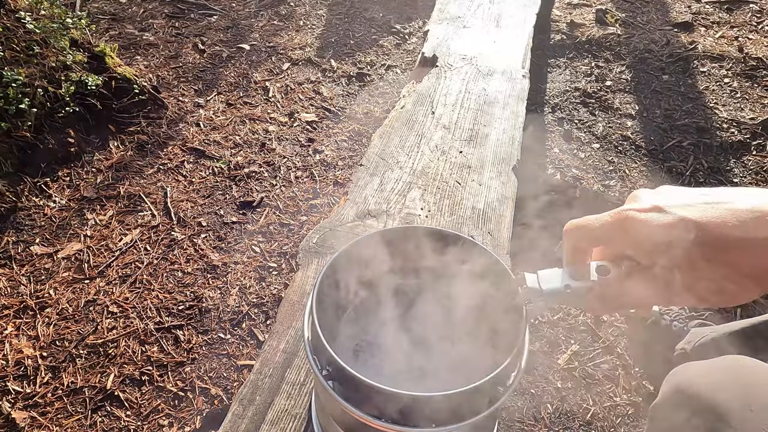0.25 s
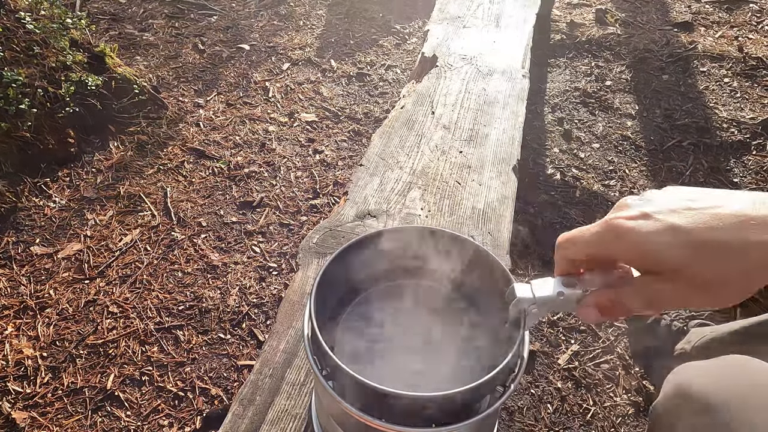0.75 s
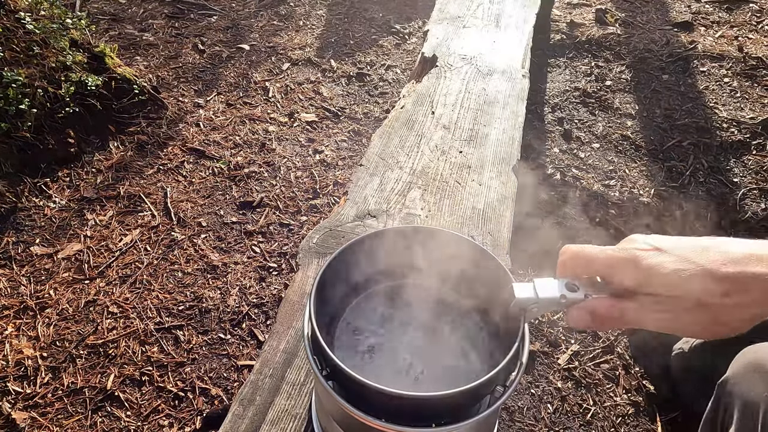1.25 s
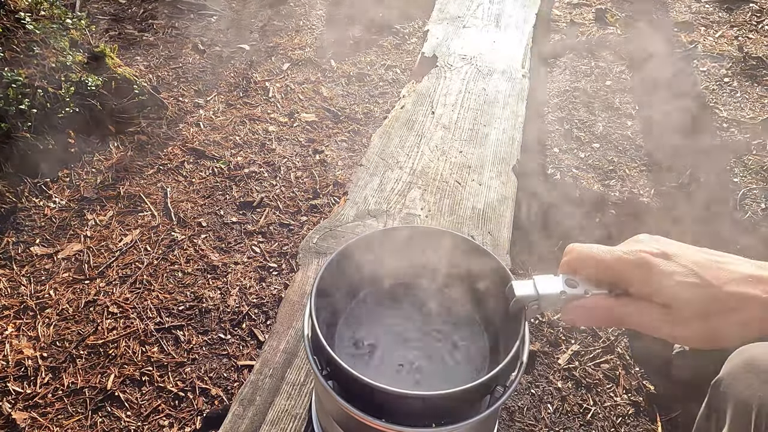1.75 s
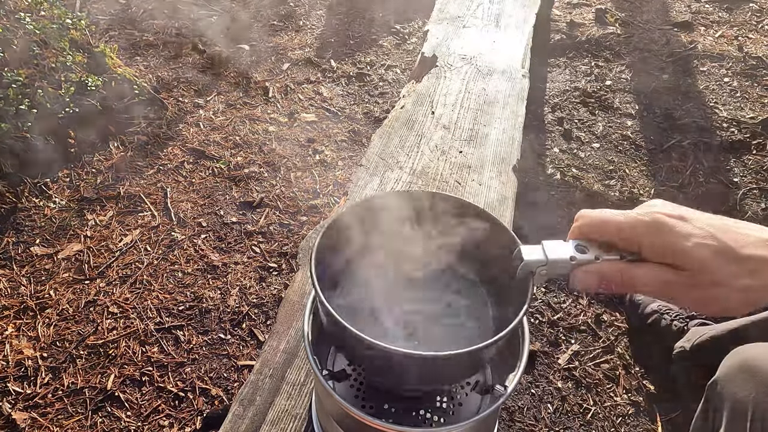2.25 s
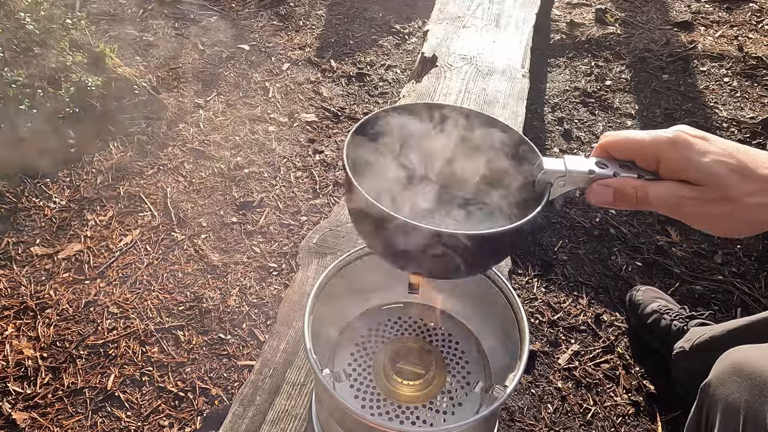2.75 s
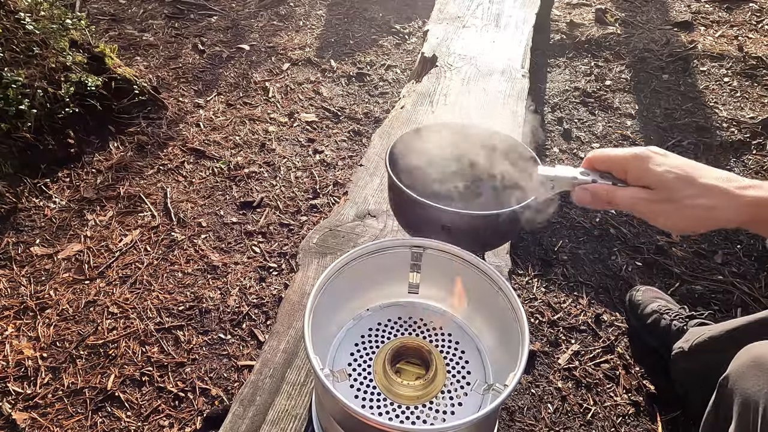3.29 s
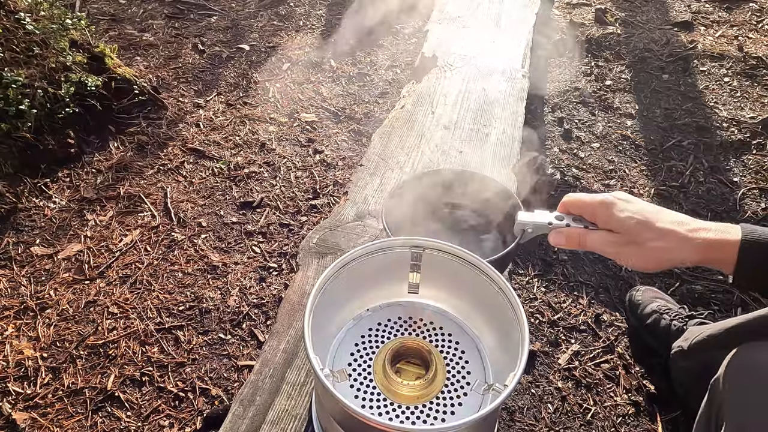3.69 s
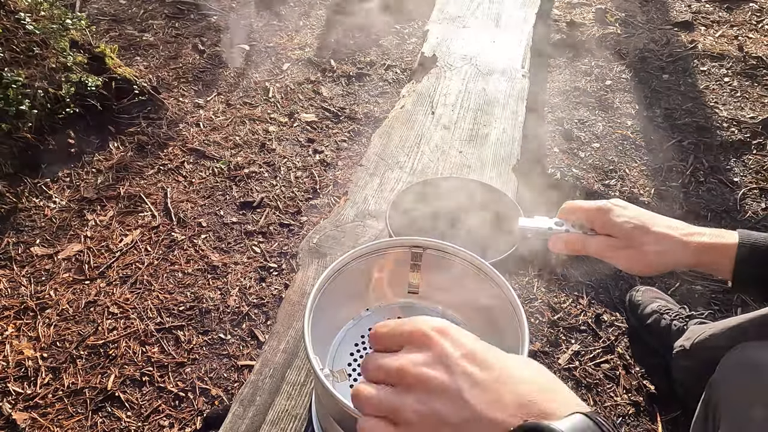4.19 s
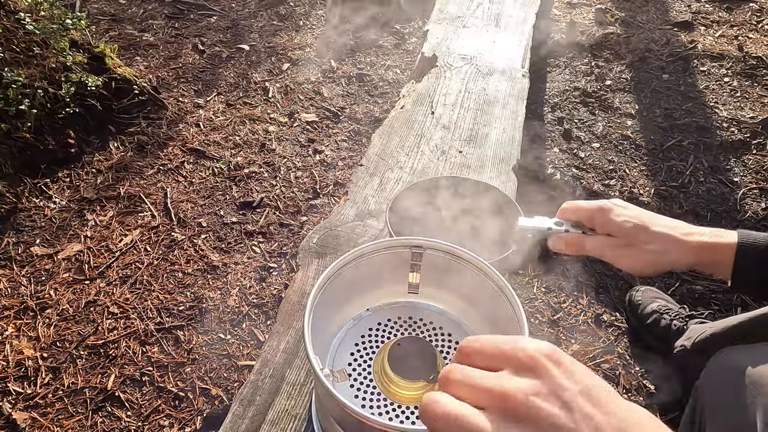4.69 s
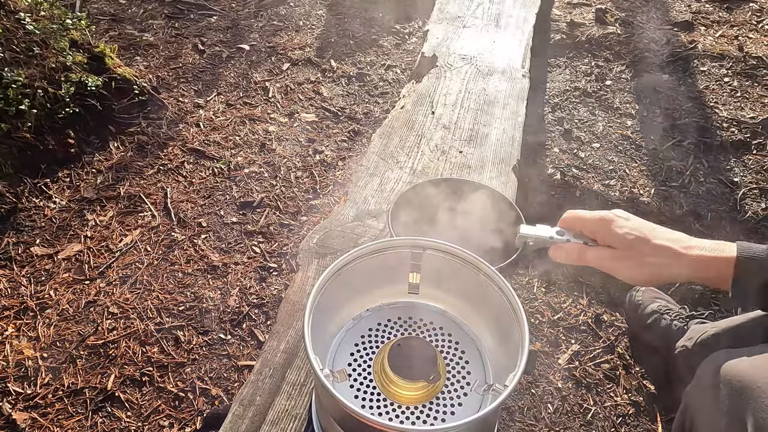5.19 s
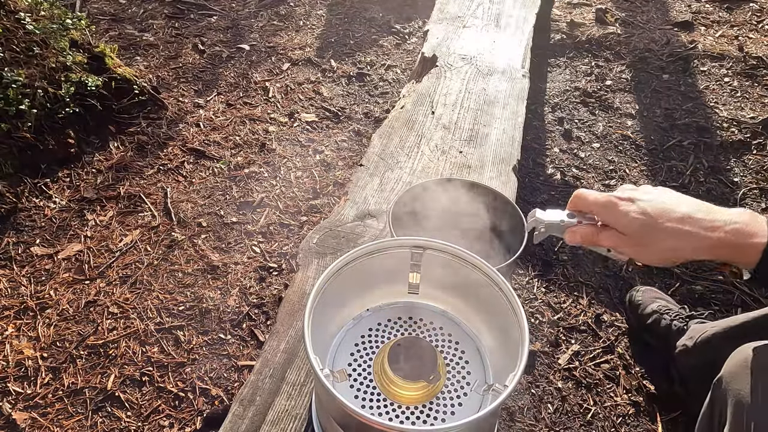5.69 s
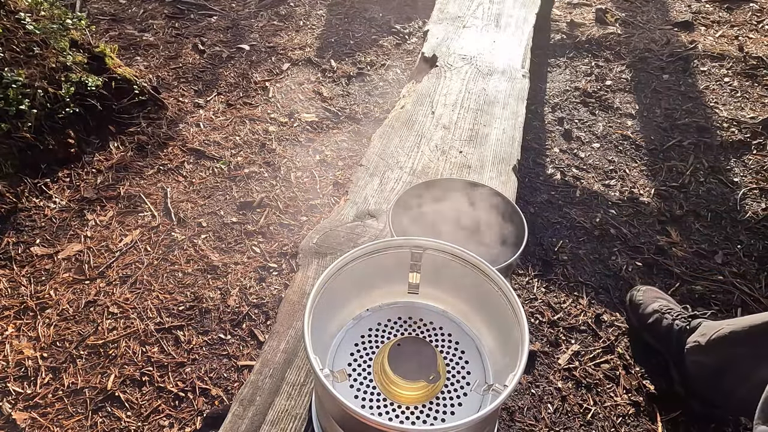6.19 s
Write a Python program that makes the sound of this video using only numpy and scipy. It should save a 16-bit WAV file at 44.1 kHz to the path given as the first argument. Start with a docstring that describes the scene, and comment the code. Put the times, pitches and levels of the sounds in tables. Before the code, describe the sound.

Close to a small camera in quiet woods, a pot simmers softly while a metal gripper knocks it several times, then scrapes briefly along it. A thin metal support falls with a sharp, loud clatter. The pot settles on wood with faint ticks as a distant bird twitters. A small lid drops and bounces on the burner, ringing briefly. Sleeve rustle and dry gripper clicks finish, over faint low air rumble.

```python
"""A simmering pot on a camp stove in a quiet wood is tapped and scraped by a gripper, close to a small camera.
The pot meets a log, the thin metal windshield clatters, a snuffer lid drops on the burner, the gripper clicks.
Contacts ring damped modes under a noise rattle; scrapes, simmer and sleeve rustle are coloured grainy noise.
Low noise in gusts buffets the microphone ports; a far bird is gliding sines with a diffuse tail."""
import sys
import numpy as np
from scipy import signal
from scipy.fft import rfft, irfft, next_fast_len
from scipy.io import wavfile
from scipy.ndimage import map_coordinates

SR = 44100
rng = np.random.default_rng(int(sys.argv[2]) if len(sys.argv) > 2 else 0)


def dump_mix(stems):
    """Bounce the given channels to the path in sys.argv[1] as a 16-bit WAV at rate SR."""
    frames = np.atleast_2d(stems).T  # one column per channel
    limited = np.clip(frames, -1, 1)  # hard clip at full scale
    pcm = np.round(limited * 32767).astype(np.int16)
    wavfile.write(sys.argv[1], SR, pcm)


N = 284445

# Pot resonances. Each row: centre in Hz, width in Hz, level in dB.
POT_MODES = [(489.6, 56, 3), (1500, 18, -40), (1930, 200, -2.5), (2368, 35, -6.5), (2745, 25, -15),
             (3073, 69, -9.5), (3370, 32, -10), (3513, 69, -7), (3816, 69, -3.5), (4540, 68, -4.5),
             (5415, 130, 0.5), (6390, 79, -0.5), (7000, 31, -8), (9300, 74, -34)]


def amp(db):
    """Gain of a level in dB."""
    return 10 ** (np.asarray(db) / 20)


def unit(x):
    """x at rms 1."""
    return x / np.sqrt(np.mean(x ** 2) + 1e-20)


def along(points, hz):
    """Interpolates (Hz, value) points on a log frequency axis."""
    point_hz, value = np.transpose(points)
    return np.interp(np.log(hz + 1), np.log(point_hz + 1), value)


def curves(rows):
    """One value per sample for each column after the time in seconds."""
    s, *columns = np.transpose(rows)
    return [np.interp(np.arange(N) / SR, s, column) for column in columns]


def wobble(rate_hz, size=N):
    """A smooth random curve through rate_hz random knots a second."""
    knots = rng.standard_normal(int(size * rate_hz / SR) + 4)
    return map_coordinates(knots, [np.arange(size) * rate_hz / SR])


def swells(rows, rounding):
    """Gain of (peak s, dB, rise s, fall s) swells that lose 20 dB over their rise or fall time."""
    t, power = np.arange(N) / SR, 0
    for s, db, rise_s, fall_s in rows:
        distance = np.abs(t - s) / np.where(t < s, rise_s, fall_s)
        power = power + amp(db - 20 * distance ** rounding) ** 2
    return np.sqrt(power)


def filtered(x, response):
    """x through a response given as a function of Hz."""
    m = next_fast_len(x.shape[-1] + SR // 4)
    spectrum = rfft(x, m) * response(np.fft.rfftfreq(m, 1 / SR))
    return irfft(spectrum, m)[..., :x.shape[-1]]


def resonances(modes, hz):
    """Causal response of (Hz, width Hz, dB) modes with alternating signs."""
    total = 0
    for k, (centre, width, db) in enumerate(modes):
        bandpass = 1j * hz * width / (centre * centre - hz * hz + 1j * hz * width)
        total = total + (-1) ** k * amp(db) * bandpass
    return total


def rush(colour, alike, grain_db, grain_rate_hz, size=N, band_hz=(0, SR)):
    """Stereo noise, grainy by fast random gain, normalised by its power in band_hz; colour maps Hz to gain."""
    m = next_fast_len(size)
    hz = np.fft.rfftfreq(m, 1 / SR)
    turn = np.arccos(np.clip(along(alike, hz), -1, 1)) / 2  # left-right likeness sets the mid/side mix
    pair = rng.standard_normal((2, size)) * amp(grain_db * wobble(grain_rate_hz, size=size))
    mid, side = rfft(pair, m) * colour(hz) * [np.cos(turn), np.sin(turn)]
    inside = (hz > band_hz[0]) & (hz < band_hz[1])
    power = 2 * np.sum(np.abs(mid[inside]) ** 2 + np.abs(side[inside]) ** 2) / m ** 2
    return irfft([mid + side, mid - side], m)[:, :size] / np.sqrt(power)


def add(out, s, sound, pan_db):
    """Mixes a sound into out at time s; positive pan_db favours the left."""
    part = out[:, round(s * SR):][:, :sound.shape[-1]]
    part += amp([[pan_db / 2], [-pan_db / 2]]) * sound[..., :part.shape[1]]


def contacts(table, modes, attack_s, rattle_db, spread, treble_left_db, pan_db, lift_db):
    """Each contact rings the modes, most near the struck spot's pitch, and rattles in tiny collisions."""
    out, t = np.zeros((2, N)), np.arange(10800) / SR
    grid_hz = np.fft.rfftfreq(len(t), 1 / SR)
    hz, width_hz, mode_db = np.transpose(modes)
    tones = np.exp(-np.pi * np.outer(width_hz, t)) * np.sin(2 * np.pi * np.outer(hz, t))
    body = (0.76 + np.abs(resonances(modes, grid_hz))) / np.sqrt(grid_hz + 100)
    # the camera's body shades the treble on one side and makes it differ between the ports
    shade_db = along([(3000, 0), (9000, treble_left_db)], grid_hz)
    shade = amp(np.outer([.5, -.5], shade_db))
    apart = np.outer([1, -1], spread * np.clip(grid_hz / 12000, .1, 1))
    for s, db, low_db, high_db, t60_s, ring_db, spot_hz in table:
        tilt = [(80, low_db - 42.5), (600, low_db), (2800, 0.0044), (8500, high_db), (16000, high_db - 5)]

        def struck_db(f):
            near_spot = np.exp(-.5 * (np.log((f + 1) / spot_hz) / 0.054) ** 2)
            return along(tilt, f) + lift_db * near_spot

        ring = amp(mode_db + struck_db(hz) + rng.normal(0, 1.5, hz.shape)) @ tones
        mid, side = rfft(rng.standard_normal((2, len(t))))
        rattle = unit(irfft((mid + apart * side) * shade * body * amp(struck_db(grid_hz)), len(t)))
        decay_db = -60 * t / max(t60_s, .005)
        rattle = amp(rattle_db + decay_db + 2.4 * wobble(252.5, size=len(t))) * rattle
        soft_s = attack_s * amp(max(low_db + 7.0, 0))  # a dull blow is a slow, soft contact
        onset = 1 - np.exp(-t / soft_s)
        add(out, s - attack_s, amp(db) * onset * (0.34 * amp(ring_db) * ring + rattle), pan_db)
    return out


def free_ring(drop, modes, attack_s):
    """A part left undamped sings on in a few clean modes."""
    out, t = np.zeros((2, N)), np.arange(SR // 2) / SR
    ring = sum(amp(db - 60 * t / t60_s) * np.sin(2 * np.pi * hz * t) for hz, db, t60_s in modes)
    start_s, level_db = drop
    add(out, start_s, amp(level_db) * (1 - np.exp(-t / attack_s)) * ring, pan_db=-2.5)
    return out


def pot_taps():
    """Taps of the gripper ring the pot."""
    # Gripper on pot. Each row: time in seconds, level in dB, low tilt in dB, high tilt in dB,
    # rattle t60 in seconds, ring trim in dB, favoured pitch in Hz.
    taps = [(0.4317, -17, 3.5, -6.5, 0.051, -1, 2260), (0.761, -13, -4.5, -9, 0.038, 0.5, 3600),
            (0.854, -23, -4, -20, 0.045, -15, 1000), (0.957, -11.5, -6.5, -2, 0.028, -8, 3010),
            (1.068, -25.5, 0, -8, 0.13, 4.5, 1590), (1.1445, -28, 13, -23, 0.11, 2, 1530),
            (1.41, -33.5, -14, -5, 0.033, -1, 3320), (1.6252, -34, -4, -8, 0.21, -10, 1620),
            (1.77, -24.5, -7, -2.5, 0.037, 2, 3300), (2.1121, -15, -7.5, -5.5, 0.04, -11.5, 2210)]
    return contacts(taps, POT_MODES, attack_s=0.001433, rattle_db=-7.5, spread=0.63,
                    treble_left_db=3.0, pan_db=-2.1, lift_db=9.5)


def scrape():
    """Uneven slips of metal on metal excite the rim's resonances over a broad grit."""
    # Scrape strokes in two lists, earlier and later. Each row: peak in seconds, level in dB,
    # rise in seconds, fall in seconds.
    stroke_lists = [
        [(1.98, -53, .05, 0.034), (2.03, -56, 0.025, .06), (2.085, -37.5, 0.094, 0.037)],
        [(2.125, -36, 0.018, .05), (2.21, -44.5, 0.066, .06), (2.285, -34, 0.096, 0.079)],
    ]
    # The rim's resonances in the earlier and in the later strokes. Each row: centre in Hz,
    # width in Hz before the sliding damps it, level in dB.
    rim_modes = [(1664, 44, 5), (2208, 32, 9), (2197, 22, 6), (2840, 25, -2), (3570, 69, -14),
                 (3580, 53, -1.5), (4200, 51, -3.5), (6150, 70, -23)], [(1558, 20, 1.5), (2096, 17, 3),
                 (2400, 98, -8), (3250, 47, -9), (3600, 73, -22), (4520, 50, -4.5), (5170, 17, -10),
                 (5300, 40, -18), (6700, 56, -23)]
    grit = [(100, -35), (700, -13), (3000, -14), (9000, -25.5), (15000, -35)]  # Hz, dB
    out = 0
    for strokes, modes in zip(stroke_lists, rim_modes):
        rubbed = [(hz, 2.5 * width_hz, db) for hz, width_hz, db in modes]  # the sliding contact damps the rim
        colour = lambda hz: resonances(rubbed, hz) + amp(along(grit, hz))
        noise = rush(colour, [(1000, 0.95)], grain_db=1.5, grain_rate_hz=170)
        out = out + swells(strokes, rounding=2.2) * noise
    return out * amp([[-.75], [.75]])


def log_taps():
    """The pot settling on a log: short contacts through the pot's modes."""
    # Pot on log. Each row: time in seconds, level in dB, low tilt in dB, high tilt in dB,
    # rattle t60 in seconds, ring trim in dB, favoured pitch in Hz.
    taps = [(3.5617, -27.5, -23, -7, 0.02, -7, 6900), (3.5985, -29.5, -21, -5, 0.02, -3, 2745),
            (3.6465, -30.5, -1, -7, 0.023, -10, 2530), (5.3495, -30, -4, -17, 0.027, -25, 2440)]
    return contacts(taps, POT_MODES, attack_s=0.0005, rattle_db=-9.5, spread=0.52,
                    treble_left_db=4, pan_db=-5.5, lift_db=6)


def windshield_clatter():
    """A support prong falls in the thin windshield: a rattling clatter and one free mode."""
    # Prong clatter: a faint low lead-in, then the main knocks and their rattling tail.
    # Each row: time in seconds, level in dB, low tilt in dB, high tilt in dB,
    # rattle t60 in seconds, ring trim in dB, favoured pitch in Hz.
    clatter = [(3.171, -38, 1.5, -28, 0.022, -2, 900), (3.182, -30.5, 11, -14, 0.024, 4, 910),
               (3.192, -4, -6, -14, 0.028, 1, 2070), (3.196, -8.5, -26.5, -1.5, 0.098, -15, 5400),
               (3.2147, -19.5, -0.5, -19, 0.081, 0, 980), (3.239, -26.5, -27, -10, 0.18, 2, 3000),
               (3.26, -30.5, -16, -11.5, 0.14, -4, 3000)]
    # Prong resonances. Each row: centre in Hz, width in Hz, level in dB.
    prong_modes = [(731, 320, -30), (900, 110, 7), (1537, 130, 1.5), (2040, 61, -1.5), (2700, 72, -22),
                   (3380, 47, -2.5), (4090, 53, -4), (4680, 50, -4), (5300, 83, -2), (5930, 28, -6),
                   (6320, 66, 0), (7410, 61, 7), (8760, 39, -2), (10800, 44, -3)]
    # Free ring: start in seconds, level in dB.
    base_drop = (3.196, -28)
    # Its modes. Each row: pitch in Hz, level in dB, t60 in seconds.
    base_modes = [(662, -1, .22)]
    struck = contacts(clatter, prong_modes, attack_s=0.00041, rattle_db=-5.0, spread=0.16,
                      treble_left_db=4.5, pan_db=-3.0, lift_db=3.5)
    return struck + free_ring(base_drop, base_modes, attack_s=0.0059)


def lid_drop():
    """The lid bounces on the burner, ringing the stove, and sings in its own modes."""
    # Lid knocks. Each row: time in seconds, level in dB, low tilt in dB, high tilt in dB,
    # rattle t60 in seconds, ring trim in dB, favoured pitch in Hz.
    knocks = [(4.552, -9, -7, -9.5, 0.13, 0, 2096), (4.5705, -9.5, -8, 0, 0.12, 1, 3080),
              (4.5805, -8, -19, -3.5, 0.25, 4.5, 2180), (4.594, -16.5, 0, -5, 0.35, -2, 2100),
              (4.622, -12, -17, -4.5, 0.11, 3, 1120), (4.633, -21, 4, -1, 0.082, 3, 1060),
              (4.645, -26, 0, -17, 0.059, 1, 980), (4.669, -23, -2, -8, 0.071, 5.5, 950),
              (4.6968, -8, -3, -4.5, 0.13, -2.5, 3130), (4.721, -19, 11, -16, 0.14, -5, 1000)]
    # Stove resonances. Each row: centre in Hz, width in Hz, level in dB.
    stove_modes = [(598, 26, -3), (720, 18, -7), (990, 47, 5.5), (1054, 51, 8), (1330, 56, 2.5),
                   (2085, 46, 1.5), (2126, 79, 2.5), (2150, 67, -9), (2620, 35, -22), (3120, 40, -14),
                   (2940, 110, -1.5), (2980, 46, -10), (3226, 48, -2.5), (3470, 55, -5), (3820, 34, -13),
                   (4140, 220, 3), (4490, 32, -14), (4660, 42, -5), (5130, 200, -0.5), (5800, 260, -3),
                   (6880, 160, -4), (7440, 110, -8)]
    # Free ring: start in seconds, level in dB.
    ring_start = (4.697, -29)
    # Its modes. Each row: pitch in Hz, level in dB, t60 in seconds.
    lid_modes = [(1529, -10, .3), (1637, -1, .42), (5416, -12, .45), (5490, -15, .4), (5857, -18, .3),
                 (6729, -18, .4), (7897, -21, .3)]
    struck = contacts(knocks, stove_modes, attack_s=0.00099, rattle_db=-7.0, spread=0.29,
                      treble_left_db=3.5, pan_db=-2.5, lift_db=8.0)
    return struck + free_ring(ring_start, lid_modes, attack_s=0.014)


def gripper_clicks():
    """The gripper lets go in sharp, mostly bright clicks."""
    # Clicks. Each row: time in seconds, level in dB, low tilt in dB, high tilt in dB,
    # rattle t60 in seconds, ring trim in dB, favoured pitch in Hz.
    clicks = [(5.492, -42, -20, -9, .06, -6, 2800), (5.5083, -22.5, -18, -10, 0.044, 8, 2470),
              (5.61, -30.5, -37, -18, 0.053, 1, 2370), (5.6635, -22, -17, -17, 0.051, -1, 2310),
              (6.0811, -30.5, -30, -14, 0.1, 5, 4770), (6.107, -36, -32, -18, .025, -2, 6100),
              (6.151, -43, -29, -18, .04, -1, 4860), (6.1676, -16.5, -49, 5.5, 0.034, -5, 5180),
              (6.275, -39, -25, 6, 0.021, -7, 6560), (6.2944, -39, -25, 1, .025, -4, 5000),
              (6.3194, -31, -43, -2, 0.048, -1, 5040), (6.3842, -37, -33, -11, 0.047, -3, 5030),
              (6.4414, -31, -12, -13.5, .03, -15, 6090)]
    # Gripper resonances. Each row: centre in Hz, width in Hz, level in dB.
    grip_modes = [(2456, 96, -13), (3190, 150, -5.5), (4100, 620, -1.5), (4780, 130, 0), (6160, 220, 3.5),
                  (6900, 240, 1), (7540, 250, 1), (8100, 180, -14), (9100, 140, -16), (9800, 330, -1),
                  (11400, 190, -6), (12150, 59, -21)]
    return contacts(clicks, grip_modes, attack_s=0.00029, rattle_db=-7, spread=0.55,
                    treble_left_db=6, pan_db=-5.5, lift_db=12.5)


def dull_bumps():
    """Each bump is one dull, damped swing, stronger on the right port."""
    # Bumps through windshield, log and camera mount. Each row: start in seconds, level in dB,
    # pitch in Hz, t60 in seconds, rise in seconds.
    bump_rows = [(2.129, -29.5, 485, 0.052, 0.0024), (2.141, -35.5, 147, 0.11, 0.0055),
                 (2.15, -41, 83, 0.19, .015), (6.32, -45.5, 73.6, 0.14, .012),
                 (3.1908, -1, 900, .018, .002), (4.696, -8, 1010, 0.012, 0.00061),
                 (3.192, -23.5, 169, 0.079, .003), (3.2, -30.5, 85.4, 0.27, 0.0058),
                 (3.249, -27.5, 132.6, 0.23, 0.0084), (4.036, -34.5, 217, 0.07, 0.0022),
                 (4.554, -33.5, 106.6, 0.48, 0.0055), (5.26, -35.5, 192, 0.13, 0.0099),
                 (5.27, -40, 93, 0.4, 0.015), (5.352, -40, 179, 0.08, 0.0038),
                 (5.52, -44, 586, 0.14, 0.0046), (6.28, -58, 167, 0.14, 0.0093)]
    out, t = np.zeros((2, N)), np.arange(SR // 3) / SR
    for s, db, hz, t60_s, rise_s in bump_rows:
        envelope = amp(db - 60 * t / t60_s) * (1 - np.exp(-t / rise_s)) ** 1.96
        add(out, s, envelope * np.sin(2 * np.pi * hz * t), pan_db=-4)
    return out


def simmer_and_sleeve():
    """Bubbles hum in the pot's walls, the sleeve rubs in fine grains, a faint hiss lies under all."""
    # Simmer, fading as the pot is lifted away. Each row: time in seconds, simmer in dB, treble hiss in dB.
    simmering = [(0, -54, -73.5), (.6, -52.5, -68.5), (1.0, -53, -64), (2.2, -51.5, -64.5),
                 (2.45, -54.5, -63.5), (2.85, -64.5, -61.5), (3.2, -72, -68.5), (3.4, -76.5, -77),
                 (5.0, -73, -80), (6.45, -119, -72)]
    # Sleeve rubs. Each row: peak in seconds, level in dB, rise and fall in seconds over 20 dB.
    reaches = [(.4, -57.5, 1, 1), (1.13, -49, 0.23, 0.61), (1.8, -55, .4, 0.24), (2.27, -60, 0.23, 0.14),
               (2.72, -54.5, 0.43, 0.79), (3.6, -54.5, 0.11, 0.1), (4.12, -42.5, 0.47, 0.53),
               (5.05, -46.5, 0.34, 0.36), (5.27, -51.5, 0.24, 0.1), (5.79, -41, 0.38, 0.39),
               (6.25, -54.5, 0.98, 1)]
    # Simmer spectrum. Each row: Hz, relative dB per Hz.
    simmer_colour = [(53, -54), (90, -18), (236, 1), (521, -2), (1360, -21), (1620, -14.5), (2480, -54),
                     (2710, -16), (4330, -20), (11900, -33.5), (15000, -32)]
    # Resonances of the pot with water. Each row: centre in Hz, width in Hz, relative level in dB.
    water_modes = [(513, 19, -9), (1620, 25, 5.5), (2170, 46.5, -5), (3530, 90, -14), (4960, 100, -15),
                   (7600, 70, 0.5), (9540, 70, 6), (11800, 160, 7.5)]
    # Sleeve spectrum. Each row: Hz, relative dB per Hz.
    sleeve_colour = [(210, -22), (350, -11.5), (472, -11.5), (688, -5), (844, -4), (1350, 2), (2420, -0.5),
                     (4760, -4.5), (6730, -8), (8380, -24.5), (11700, -40.5), (12800, -21), (15000, -49)]
    # Hiss spectrum. Each row: Hz, relative dB per Hz.
    hiss_colour = [(59, -12.5), (100, -27), (192, -1.5), (438, -32.5), (742, -6.5), (808, -14),
                   (1090, -5.5), (2220, -21.5), (3120, -19), (3690, -12.5), (4460, -12.5), (12000, -22.5),
                   (15500, -32)]
    # Stereo width. Each row: Hz, left-right likeness (1 is mono).
    alike = [(60, 0.25), (180, 0.91), (550, 0.94), (1650, 0.98), (4970, 1), (15000, 0.96)]
    simmer_db, hiss_db = curves(simmering)
    rub = swells(reaches, rounding=1.5)
    walls = lambda hz: amp(along(simmer_colour, hz)) * (1 + 2.53 * np.abs(resonances(water_modes, hz)))
    cloth = lambda hz: amp(along(sleeve_colour, hz))
    air = lambda hz: amp(along(hiss_colour, hz))
    simmer = rush(walls, alike, grain_db=2.0, grain_rate_hz=92, band_hz=(300, 700))
    sleeve = rush(cloth, alike, grain_db=1.0, grain_rate_hz=340, band_hz=(1000, 6000))
    hiss = rush(air, alike, grain_db=2.0, grain_rate_hz=30, band_hz=(9000, 13000))
    # each rub also lifts the low and treble layers
    low_gain = np.hypot(amp(simmer_db), amp(-20) * rub)
    treble_gain = np.hypot(amp(hiss_db), amp(-21) * rub)
    low = low_gain * simmer * amp([[-.4], [.4]])
    return low + rub * sleeve * amp([[-1.1], [1.1]]) + treble_gain * hiss


def air_rumble():
    """Slow air pushes the ports in lumps of very low noise."""
    # Changing breeze: very low rumble that rises and falls. Each row: time in seconds, level in dB.
    breeze = [(0, -66), (2.5, -73), (3.3, -63.5), (4.0, -49.5), (4.8, -65), (5.3, -48.5), (5.6, -66),
              (6.45, -79)]
    # Gusts. Each row: peak in seconds, level in dB.
    gust_rows = [(.75, -61), (1.13, -56), (2.15, -54), (3.4, -52.5), (3.901, -51), (3.99, -52),
                 (4.26, -40.5), (4.57, -26.5), (4.7, -34), (5.08, -38.5), (5.3, -40.5)]
    # Rumble spectrum. Each row: Hz, relative dB per Hz.
    rumble_colour = [(12, -5), (35, -7), (60, -15), (100, -41), (200, -120)]
    rise_s, fall_s = 0.083, 0.16
    gusts = swells([(s, db, rise_s, fall_s) for s, db in gust_rows], rounding=0.74)
    rumble = rush(lambda hz: amp(along(rumble_colour, hz)), [(30, 0.73)], grain_db=4.5, grain_rate_hz=12)
    return np.hypot(amp(*curves(breeze)), gusts) * rumble


def port_thuds():
    """Air and shifting clothes push the ports in short low thuds over a slowly varying stir."""
    # Low stir between the thuds. Each row: time in seconds, level in dB.
    stir = [(0, -64), (2.8, -61.5), (3.1, -69.5), (6.45, -64.5)]
    # Thuds. Each row: peak in seconds, level in dB.
    thud_rows = [(.75, -49.5), (2.15, -45), (2.73, -49), (3.211, -38), (3.63, -51.5), (4.06, -49.5),
                 (4.57, -34.5), (4.71, -43), (5.28, -42), (5.53, -53), (5.658, -47.5), (6.07, -60.5),
                 (6.29, -50)]
    # Thud spectrum. Each row: Hz, relative dB per Hz.
    thud_colour = [(40, -64), (75, -54), (130, -1.5), (220, -2.5), (380, -16.5), (800, -120)]
    rise_s, fall_s = 0.039, .14
    thuds = swells([(s, db, rise_s, fall_s) for s, db in thud_rows], rounding=0.66)
    noise = rush(lambda hz: amp(along(thud_colour, hz)), [(150, 0.63)], grain_db=3.5, grain_rate_hz=34)
    return np.hypot(amp(*curves(stir)), thuds) * noise


def bird():
    """Short whistled slides, smeared by the trees."""
    # Single notes. Each row: start in seconds, length in seconds, start, middle and end pitch in Hz, level in dB.
    notes = [(3.32, .05, 3800, 4300, 4900, -53), (3.358, .018, 3850, 3900, 3800, -55),
             (3.42, .015, 3500, 3700, 3600, -48), (4.19, .06, 3050, 3150, 3500, -52),
             (4.385, .02, 3300, 3100, 3000, -51), (4.405, .055, 3100, 3450, 3750, -52),
             (4.41, .04, 3000, 2800, 2600, -55), (4.462, .02, 3700, 4000, 4400, -53),
             (5.29, .11, 2650, 3180, 2600, -54)]
    # Repeated phrase. Each row: delay in seconds, length in seconds, start, middle and end pitch in Hz,
    # relative level in dB.
    phrase = [(0, .032, 3900, 4180, 4400, 0), (.043, .016, 3500, 3780, 3900, -5),
              (.077, .044, 3730, 3280, 2620, 0)]
    # Phrase starts. Each row: start in seconds, level in dB, extra level of the first slide in dB.
    phrase_starts = [(3.484, -51, 0), (3.668, -48, 0), (3.851, -47, -12), (4.036, -49, -8)]
    sung = list(notes)
    for s, db, first_db in phrase_starts:
        for after_s, *slide, note_db in phrase:
            sung.append((s + after_s, *slide, db + note_db + first_db * (after_s == 0)))
    out = np.zeros((2, N))
    for s, length_s, start_hz, middle_hz, end_hz, db in sung:
        u = np.arange(round(length_s * SR)) / (length_s * SR)
        # parabola through the three pitches
        hz = start_hz * (1 - u) * (1 - 2 * u) + 4 * middle_hz * u * (1 - u) + end_hz * u * (2 * u - 1)
        swell = np.sin(np.pi * u) ** .6
        add(out, s, amp(db) * swell * np.sin(2 * np.pi * np.cumsum(hz) / SR), pan_db=2.0)
    tail_t = np.arange(SR // 2) / SR
    trees = rng.standard_normal((2, SR // 2)) * amp(-60 * tail_t / 4.2)
    smeared = signal.fftconvolve(out, trees / np.linalg.norm(trees[0]), axes=1)[:, :N]
    return out + amp(1.5) * smeared


def scene():
    """All sources together."""
    metal = pot_taps() + log_taps() + windshield_clatter() + lid_drop() + gripper_clicks()
    background = simmer_and_sleeve() + air_rumble() + port_thuds() + bird()
    return metal + scrape() + dull_bumps() + background


def record(dry):
    """The input stage rounds off the highest peaks; the camera's treble falls, then stops at its band limit."""
    top_hz = 15700
    treble_fall = [(12500, -1.0), (14000, -12), (15600, -40.5)]  # Hz, dB
    soft = dry / (1 + np.abs(dry / .9) ** 4) ** (1 / 4)
    return filtered(soft, lambda hz: amp(along(treble_fall, hz)) * (hz < top_hz))


dry = scene()
out = record(dry)
dump_mix(out)
```